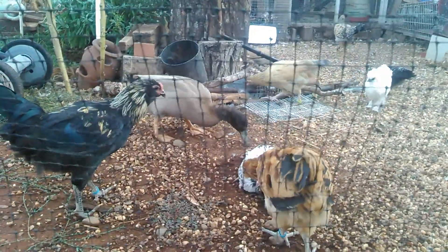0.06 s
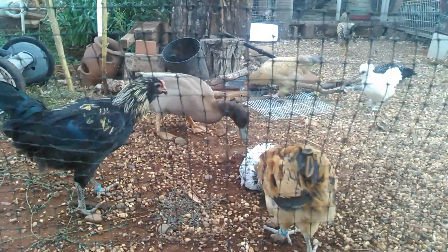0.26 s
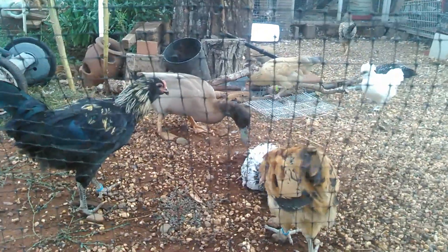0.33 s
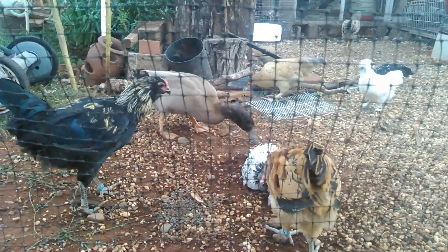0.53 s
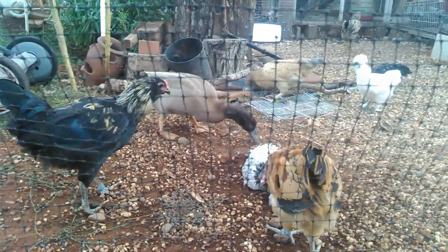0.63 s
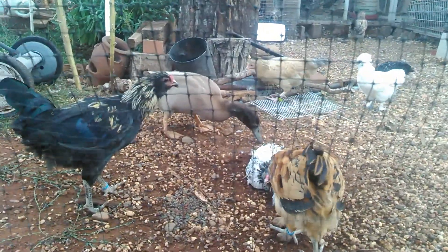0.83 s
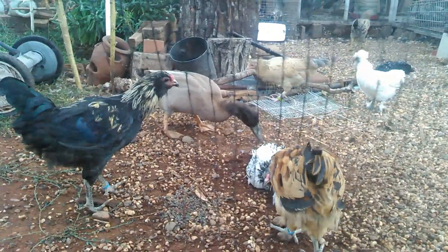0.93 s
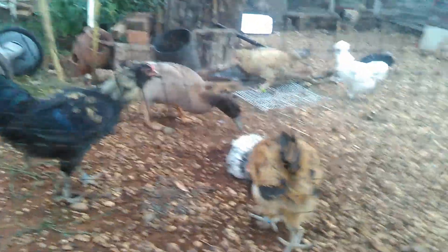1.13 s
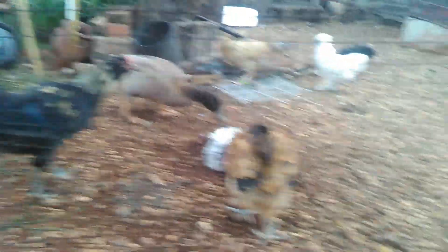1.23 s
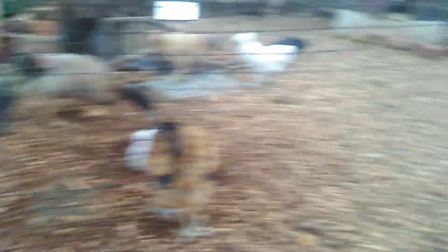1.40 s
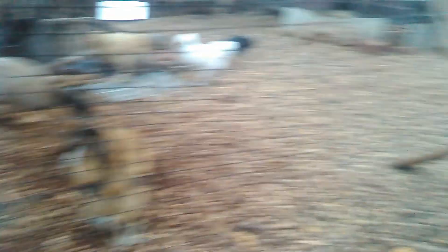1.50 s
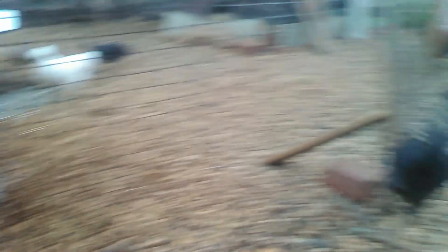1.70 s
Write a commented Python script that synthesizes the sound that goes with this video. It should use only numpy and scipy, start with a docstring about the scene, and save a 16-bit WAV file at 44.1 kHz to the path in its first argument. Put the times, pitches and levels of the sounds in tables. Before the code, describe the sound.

Chickens forage nearby in an outdoor pen, making short gritty scrapes and flurries of sharp pecking ticks. Soft, high, falling peeps from a young bird come in between, along with dull feather rustles and a faint low rumble.

```python
"""Chickens forage on dry, stony dirt in an outdoor pen.
From the start a young bird whistles soft falling peeps over steady air and a faint, uneven rumble.
Claws rake the grit into dense tiny collisions; then pecks and flicked stones tick and ring sharply.
Feathers join with a duller rustle, and soft blows thud on the earth.
Past one second come the loudest peeps and another flurry of ticks; a last short scrape ends the scene."""
import sys
import numpy as np
from scipy import signal
from scipy.fft import rfft, irfft, next_fast_len
from scipy.io import wavfile

SR = 44100
rng = np.random.default_rng(int(sys.argv[2]) if len(sys.argv) > 2 else 0)


def int16_out(signal):
    """Quantize to a 16-bit WAV file."""
    q = np.round(np.clip(np.atleast_2d(signal).T, -1, 1) * 32767)
    wavfile.write(sys.argv[1], SR, q.astype(np.int16))


N = 77175
TIME = np.arange(N) / SR
HIT_TIME = TIME[:SR // 10]
BRUSH_ATTACK_S, BRUSH_RELEASE_S = 0.0029, 0.012

# Spectrum of colliding grit: frequency_hz, gain_db
GRIT_SPECTRUM = [(300, -43), (1200, -20.5), (2000, -16), (2600, -14.5), (3600, -6.5), (5300, 0.5),
                 (7000, -9.5), (9000, -18), (12000, -41), (16000, -41)]
# Spectrum of feathers and soft earth: frequency_hz, gain_db
SOFT_SPECTRUM = [(60, -10), (170, 2), (380, 0.5), (700, -1), (1100, -4), (1600, -8), (3000, -19.5),
                 (9000, -58)]


def from_db(db):
    """Amplitude grows tenfold for every 20 dB."""
    return 10 ** (np.asarray(db) / 20)


def unit_rms(x):
    """Dividing by the rms gives unit mean power."""
    return x / np.sqrt(np.mean(x ** 2) + 1e-20)


def colour(x, spectrum):
    """Minimum-phase filtering: a folded cepstrum gives a causal response with the given spectrum."""
    size = 2 * next_fast_len(len(x))
    hz, db = np.transpose(spectrum)
    grid_hz = np.maximum(np.arange(size // 2 + 1) * SR / size, 1)
    gain = from_db(np.interp(np.log(grid_hz), np.log(hz), db))
    cepstrum = irfft(np.log(gain))
    cepstrum[1:size // 2] *= 2
    cepstrum[size // 2 + 1:] = 0
    return irfft(rfft(x, size) * np.exp(rfft(cepstrum)))[:len(x)]


def resonance(x, hz, width_hz):
    """A damped resonator with unit peak gain: the narrower its band, the longer it rings."""
    r = np.exp(-np.pi * width_hz / SR)
    feedback = [1, -2 * r * np.cos(2 * np.pi * hz / SR), r * r]
    return signal.lfilter(np.array([1, 0, -1]) * (1 - r * r) / 2, feedback, x + 1e-18)


def drift(rate_hz):
    """Random modulation of unit rms, interpolated between random values."""
    return unit_rms(np.interp(TIME * rate_hz, np.arange(N), rng.standard_normal(N)))


def grains(spectrum, per_s=3500, spread_db=2.5):
    """Shot noise: dense tiny collisions of uneven size merge into a hiss."""
    sizes = from_db(spread_db * np.minimum(rng.exponential(1, N), 4)) * rng.choice([-1, 1], N)
    impulses = sizes * (rng.random(N) < per_s / SR)
    return unit_rms(colour(impulses, spectrum))


def stroke(start_s, length_s, change_db, attack_s, release_s):
    """Amplitude envelope: linear attack, sloping hold, exponential release."""
    t = TIME - start_s
    attack = np.clip(t / attack_s, 0, 1)
    hold = from_db(change_db * np.clip(t / length_s, 0, 1))
    return attack * hold * np.exp(-np.maximum(t - length_s, 0) / release_s)


def rubbing(strokes, main_spectrum, extra_spectrum, attack_s, release_s, flutter_db):
    """Friction noise: strokes stir two kinds of grains under one unsteady pressure."""
    main, extra = grains(main_spectrum), grains(extra_spectrum)
    out = 0
    for start_s, length_s, level_db, change_db, extra_db in strokes:
        envelope = from_db(level_db) * stroke(start_s, length_s, change_db, attack_s, release_s)
        out += envelope * (main + from_db(extra_db) * extra)
    return out * from_db(flutter_db * (drift(rate_hz=190) - 1))


def burst(t60_s, t=HIT_TIME):
    """Exponential decay: noise of unit energy that falls 60 dB in t60_s."""
    noise = rng.standard_normal(len(t)) * from_db(-60 * t / t60_s)
    return noise / np.sqrt(np.sum(noise ** 2))


def placed(blow, start_s, level_db):
    """Equivalent level: a blow starts at start_s with the energy of 2 ms of sound at level_db."""
    scaled = from_db(level_db) * unit_rms(blow) * np.sqrt(0.002 / HIT_TIME[-1])
    return np.pad(scaled, (int(start_s * SR), N))[:N]


def background(air_db=-52.5):
    """Filtered noise: steady outdoor air and a low rumble that comes and goes."""
    # Spectrum of the air: frequency_hz, gain_db
    air_spectrum = [(20, -27), (55, 4), (130, -9), (190, -13), (250, -5.5), (400, -16), (800, -21),
                    (2500, -24.5), (4200, -19), (5500, -18.5), (6800, -30), (16000, -38)]
    # Spectrum of the rumble: frequency_hz, gain_db
    rumble_spectrum = [(24, -13), (40, -18), (62, 0), (110, -3), (200, -15.5), (1500, -43.5)]
    # Envelope of the rumble: time_s, level_db
    rumble_levels = [(0, -35.5), (.04, -49.5), (.2, -49.5), (.44, -49.5), (.58, -62), (.75, -49.5),
                     (.95, -66.5), (1.55, -59.5), (1.66, -49), (1.75, -79)]
    air = unit_rms(colour(rng.standard_normal(N), air_spectrum))
    rumble = unit_rms(colour(rng.standard_normal(N), rumble_spectrum))
    rumble_db = np.interp(TIME, *np.transpose(rumble_levels))
    return from_db(air_db) * air + from_db(rumble_db) * rumble


def peeps(turn_share=0.8, upturn_hz=170, edge_db=-15.5):
    """Frequency modulation: whistles start rough, fall, then lift; beak resonance favours the octave."""
    # The young bird's calls: start_s, length_s, first_hz, lowest_hz, level_db, crest_share (of length)
    calls = [(-.03, 0.1, 2636, 2420, -50.5, 0.58), (-.03, 0.069, 3100, 2820, -48.5, 0.39),
             (0.207, 0.11, 3506, 3200, -44, 0.28), (0.619, 0.026, 3260, 3070, -45, 0.5),
             (0.64, 0.071, 3400, 2740, -41, 0.49), (0.831, 0.033, 3400, 3250, -43, .75),
             (0.853, 0.045, 3230, 2250, -42, 0.22), (0.895, 0.019, 2700, 2584, -43, 0.3),
             (1.059, 0.099, 3710, 2736, -38.5, 0.64), (1.294, 0.104, 3800, 2797, -38, 0.58)]
    tone, octave = np.zeros((2, N))
    waver, flutter_db = drift(rate_hz=1100), 1.6 * drift(rate_hz=290)
    for start_s, length_s, first_hz, lowest_hz, level_db, crest_share in calls:
        progress = np.clip((TIME - start_s) / length_s, 0, 1)
        fall = np.minimum(progress / turn_share, 1) ** 1.25
        lift_hz = np.interp(progress, [turn_share, 1], [0, upturn_hz])
        pitch_hz = first_hz + (lowest_hz - first_hz) * fall + lift_hz
        # The deeper the fall to come, the rougher the onset.
        jitter = 0.0084 + 0.16 * np.log2(first_hz / lowest_hz) * (1 - fall) ** 2
        phase = 2 * np.pi * np.cumsum(pitch_hz * (1 + jitter * waver)) / SR
        arch_db = np.interp(progress, [0, crest_share, 1], [edge_db, 0, edge_db])
        fade = np.clip(20 * np.minimum(progress, 1 - progress), 0, 1)
        swell = np.sqrt(2) * from_db(level_db + flutter_db + arch_db) * fade
        tone += swell * np.sin(phase)
        octave += swell * np.sin(2 * phase)
    return tone + from_db(-0.5) * resonance(octave, hz=5480, width_hz=150)


def claw_scrapes():
    """Granular friction: claws rake the grit, and fine dust adds a brighter hiss."""
    # Claw strokes: start_s, length_s, level_db, change_db, dust_relative_db
    strokes = [(.045, 0.019, -47, 1, -8.5), (.275, 0.03, -43, 0.5, -31), (.39, 0.065, -38.5, -4.5, -11.5),
               (.465, 0.097, -46.5, 2.5, -10), (.565, 0.02, -41, 3, -10.5), (.64, 0.039, -52, 4.5, -25),
               (.678, 0.052, -34, -5.5, -13.5), (.732, 0.045, -52.5, 7.5, -15),
               (.785, 0.056, -31.5, -7.5, -20), (.848, 0.085, -51, -1, -14), (.952, 0.044, -51, 1, -19),
               (1.057, 0.041, -47, -2, -11.5), (1.169, 0.052, -38.5, -1.5, -15.5),
               (1.285, 0.079, -46.5, -1.5, -13.5), (1.364, 0.02, -44, 3, -12.5),
               (1.395, 0.13, -45, -15, -11), (1.625, 0.053, -48, -2.5, -6.5)]
    # Spectrum of fine dust: frequency_hz, gain_db
    dust_spectrum = [(2000, -45), (6000, 7.5), (8000, 10), (10000, 8.5), (13000, 3.5), (16000, -5)]
    return rubbing(strokes, GRIT_SPECTRUM, dust_spectrum, attack_s=0.004, release_s=0.0067, flutter_db=1)


def grit_clicks():
    """Slip transients: lone grains give way under a claw and stand out of the raking."""
    # Slipping grains: start_s, level_db
    slips = [(0.057, -40.5), (.5249, -37), (.607, -49), (0.63, -44), (0.6366, -40.5), (0.664, -39),
             (.686, -33), (.721, -33), (0.865, -33.5), (0.8923, -32.5), (0.9037, -41), (1.22, -38)]
    return sum(placed(colour(burst(t60_s=0.0084), GRIT_SPECTRUM), start_s, level_db)
               for start_s, level_db in slips)


def dust_spray(t60_s, band_hz=(9000, 12900)):
    """Band-limited noise: fine dust thrown up by a blow gives a short, very bright hiss."""
    return signal.sosfilt(signal.butter(2, band_hz, "band", fs=SR, output="sos"), burst(t60_s))


def stone_ticks(clatter_db=8.5, dull_hz=4040, dulling_s=0.0082):
    """Modal ringing: a crack and a dulling clatter ring at each tick's own pitch, then excite a thin, hard ring
    shared by all ticks."""
    # Pecks and flicked stones: start_s, level_db, ring_hz, clatter_t60_s, ring_gain_db
    contacts = [(0.0747, -31.5, 5000, 0.012, 7), (.151, -42, 4500, 0.07, 6), (.2161, -25, 6050, 0.0076, 2),
                (0.2189, -21.5, 5130, 0.032, -1), (.222, -26, 5200, 0.01, 9),
                (0.2246, -23, 5100, 0.057, -12), (0.3145, -14.5, 5360, 0.0066, 14),
                (0.3149, -16.5, 6840, 0.014, 15), (.3187, -23, 4700, 0.074, -8),
                (0.342, -21.5, 6060, 0.069, 9.5), (0.369, -26, 4500, 0.066, 8),
                (0.572, -30.5, 4200, 0.0056, 25), (0.6709, -25.5, 5280, .008, 20),
                (0.673, -23.5, 5100, .012, 24), (0.7078, -26.5, 5240, 0.0071, 22),
                (1.0433, -27, 5230, 0.014, 10), (1.169, -29.5, 4950, 0.042, 13),
                (1.237, -25, 5770, 0.053, 20), (1.2470, -17.5, 5070, 0.0096, 13.5),
                (1.2506, -17, 5060, 0.024, 14), (1.268, -32.5, 2200, 0.033, 15),
                (1.417, -32.5, 4400, 0.064, -4)]
    # Modes of the thin, hard ring shared by all ticks: frequency_hz, gain_db
    modes = [(4150, -0.5), (4520, -3), (4700, -6), (5060, -0.5), (5470, -8), (5810, 2), (6610, -0.5),
             (6940, -7)]
    # Filter that colours every tick: frequency_hz, gain_db
    tick_spectrum = [(150, -28), (900, -17.5), (3000, -3), (4800, 0), (7200, -4), (8000, -5.5),
                     (10500, -22.5), (16000, -57)]
    lowpass = signal.butter(2, dull_hz, fs=SR, output="sos")
    bright_share = np.exp(-(HIT_TIME / dulling_s) ** 2)
    out = 0
    for start_s, level_db, ring_hz, t60_s, ring_gain_db in contacts:
        clatter = from_db(clatter_db) * burst(t60_s)
        hit = bright_share * clatter + (1 - bright_share) * signal.sosfilt(lowpass, clatter)
        hit[0] = 1  # the opening crack
        stone = hit + from_db(ring_gain_db) * resonance(hit, ring_hz, width_hz=530)
        shared_ring = sum(from_db(db) * resonance(stone, hz, width_hz=88) for hz, db in modes)
        out += placed(colour(stone + shared_ring, tick_spectrum), start_s, level_db)
        # Light or hard, every contact chips off about the same fine spray.
        out += placed(dust_spray(t60_s=0.018), start_s, level_db=-54)
    return out


def feather_brushes():
    """Soft friction: feathers and earth brush with a dull rustle and a dry rasp."""
    # Brushing strokes: start_s, length_s, level_db, change_db, rasp_relative_db
    strokes = [(.352, 0.061, -41, -10.5, -4.5), (.405, 0.18, -62, 2, -16), (.67, 0.095, -53, -2, -19),
               (.787, 0.06, -51.5, 1.5, 3.5), (.875, 0.013, -65, -1.5, 19),
               (.952, 0.038, -64.5, -0.5, 11.5), (1.183, 0.036, -40, -8, -10), (1.233, 0.032, -43, 1.5, 6),
               (1.275, 0.067, -41.5, -7.5, -22), (1.34, 0.085, -59, 4, -8)]
    # Spectrum of the dry rasp: frequency_hz, gain_db
    rasp_spectrum = [(600, -21), (1400, -8), (2000, 4), (2500, -4.5), (3050, 3.5), (3800, -12), (7000, -59)]
    return rubbing(strokes, SOFT_SPECTRUM, rasp_spectrum, BRUSH_ATTACK_S, BRUSH_RELEASE_S, flutter_db=1.5)


def earth_thuds(dust_relative_db=-9.5):
    """Damped impact: a foot or beak meets the earth with a dull puff and a spray of dust."""
    # Soft blows: start_s, level_db, t60_s
    blows = [(0.369, -30.5, 0.037), (1.236, -37.5, 0.019), (1.4172, -44.5, 0.032)]
    out = 0
    for start_s, level_db, t60_s in blows:
        out += placed(colour(burst(t60_s), SOFT_SPECTRUM), start_s, level_db)
        out += placed(dust_spray(t60_s), start_s, level_db + dust_relative_db)
    return out


def hollow_tones():
    """Amplitude modulation: faint low sinusoids swell and die like the brushing around them."""
    # Brief hollow tones: start_s, length_s, pitch_hz, level_db
    tones = [(0.837, 0.019, 651, -53.5), (1.24, 0.04, 615.6, -48.5), (1.291, 0.025, 384, -47.5),
             (1.296, 0.028, 1069, -55)]
    out = 0
    for start_s, length_s, pitch_hz, level_db in tones:
        envelope = from_db(level_db) * stroke(start_s, length_s, 0, BRUSH_ATTACK_S, BRUSH_RELEASE_S)
        out += np.sqrt(2) * envelope * np.sin(2 * np.pi * pitch_hz * TIME)
    return out


def pen_reflections(direct, t60_s=0.12, gain_db=-17.5):
    """Scattering: the ground and the clutter around return a faint, short tail."""
    return from_db(gain_db) * signal.fftconvolve(direct, burst(t60_s, TIME))[:N]


def scene():
    """Superposition: the birds, their reflections and the background add in one channel."""
    birds = peeps() + claw_scrapes() + grit_clicks() + stone_ticks()
    birds += feather_brushes() + earth_thuds() + hollow_tones()
    return (birds + pen_reflections(birds) + background())[None]


def record(dry):
    """Band limiting: a steep elliptic low-pass cuts the treble above 16.1 kHz."""
    return signal.sosfilt(signal.ellip(12, 0.1, 70, 16100, fs=SR, output="sos"), dry)


dry = scene()
out = record(dry)
int16_out(out)
```